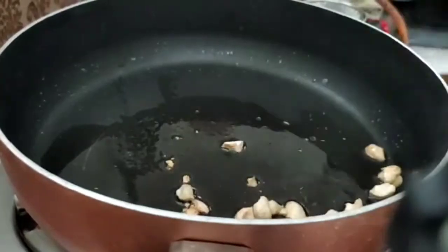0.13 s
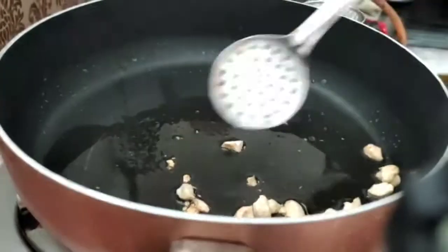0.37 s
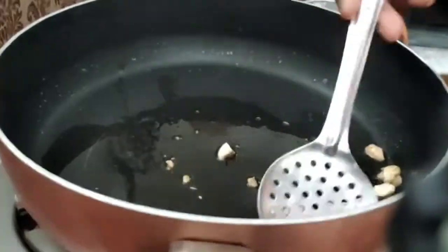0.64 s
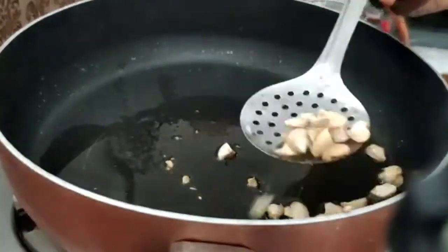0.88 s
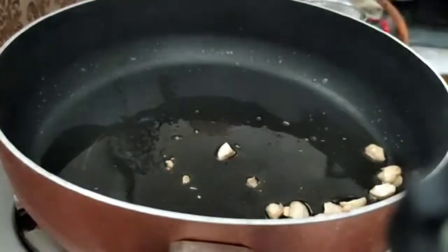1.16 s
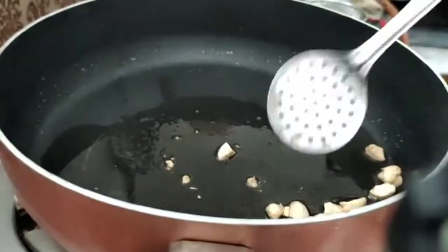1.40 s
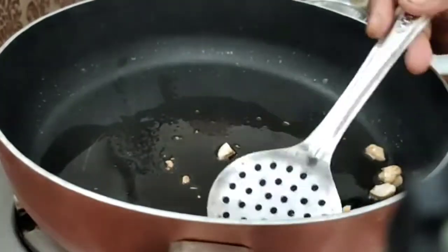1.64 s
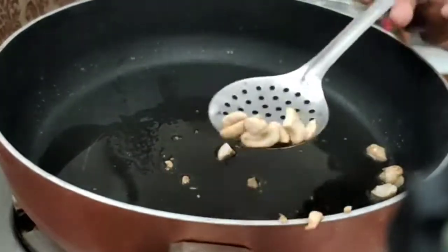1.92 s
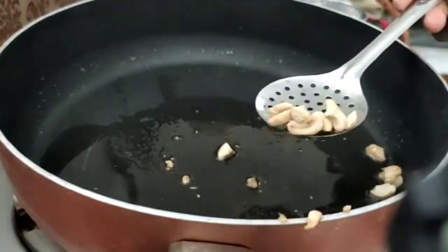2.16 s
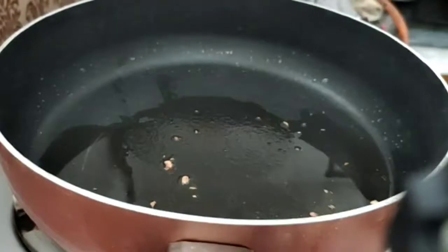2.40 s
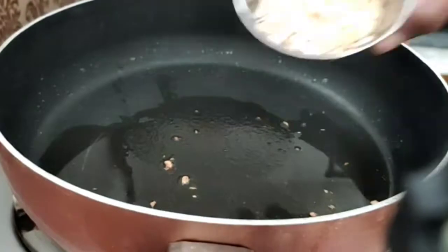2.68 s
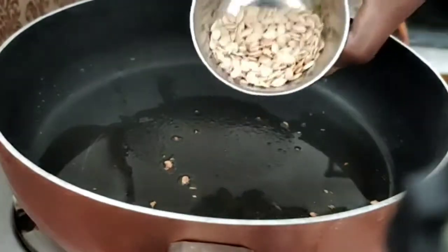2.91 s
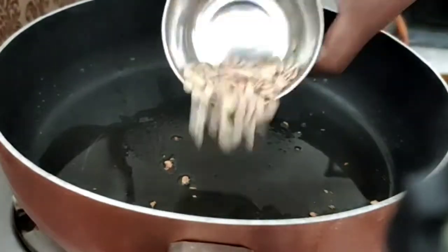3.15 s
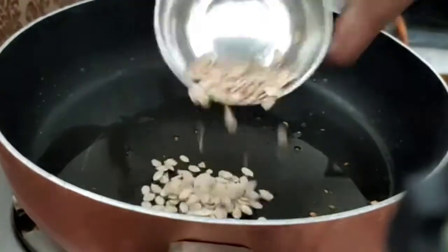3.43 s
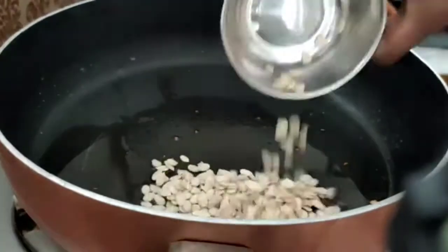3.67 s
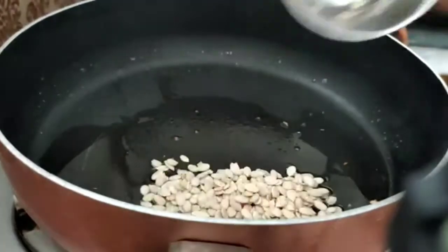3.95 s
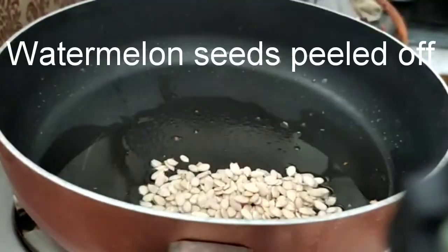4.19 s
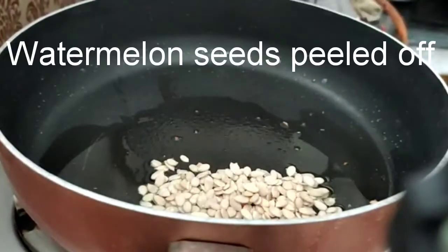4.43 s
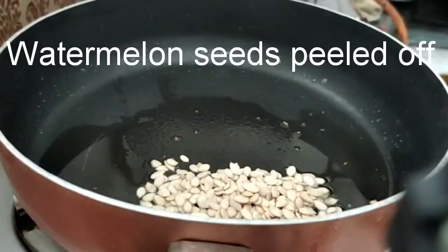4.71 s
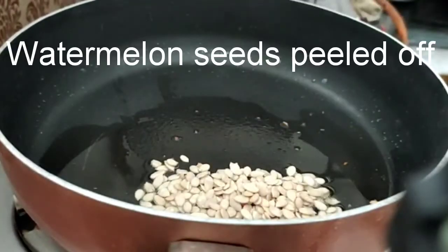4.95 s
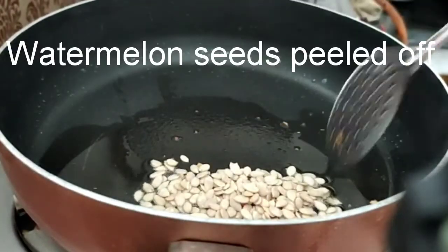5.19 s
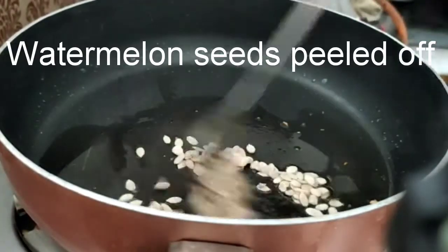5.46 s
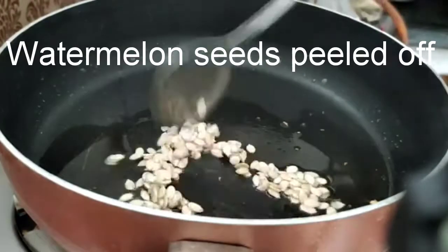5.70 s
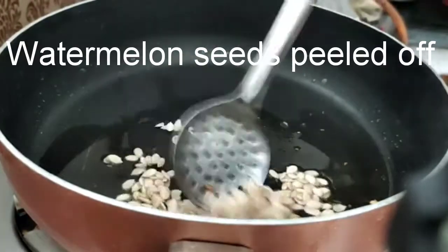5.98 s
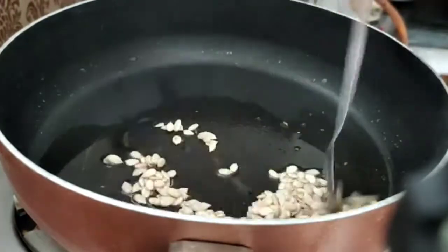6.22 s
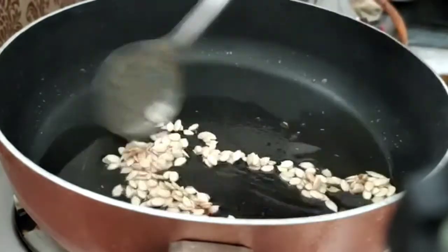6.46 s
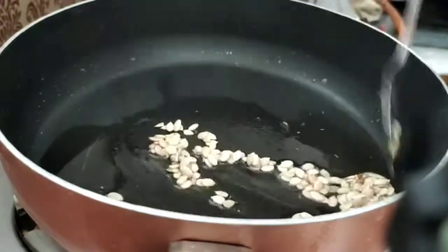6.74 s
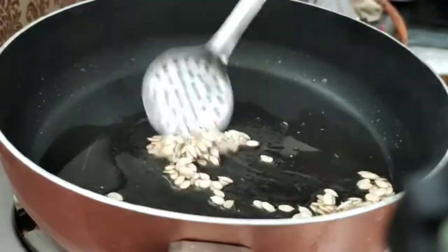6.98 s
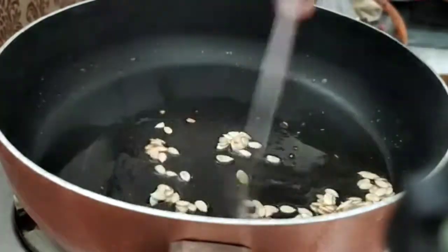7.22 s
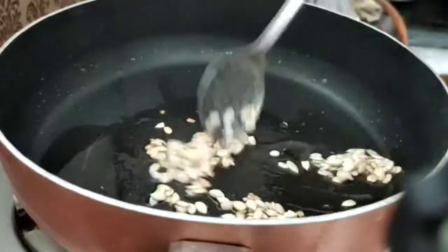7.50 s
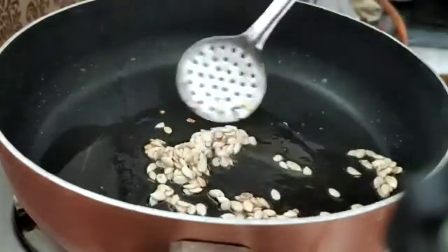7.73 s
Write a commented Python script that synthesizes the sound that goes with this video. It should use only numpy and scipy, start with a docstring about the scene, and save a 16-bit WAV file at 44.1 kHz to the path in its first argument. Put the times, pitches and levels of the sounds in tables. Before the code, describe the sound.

A quiet kitchen with a low, wavering hum, heard close up in stereo. Faint handling at first, then at about 0.5 s a spoon knocks the pan with a hollow metallic clack and scrapes until 0.8 s. Soft rings and a light scrape follow near 1.2 s; another knock and drag come at 1.5-1.8 s with small ticks, and a short rub at 2.3 s. After a lull, seeds pour from a steel bowl at 3.2-3.7 s, a bright ringing, pattering rush. Fine sizzle grows from 4 s, with a soft sliding sweep and small dish clinks at 4.7-4.8 s. From 5.2 s the spoon returns, clangs sharply near 5.45 s, and stirs hard: loud knocks, gritty scrapes and rattling seeds several times a second over bright fizz. From 6.3 s steady dull, boomy thuds beat about seven times a second to the end at nearly 8 s.

```python
"""In a quiet, humming kitchen a slotted steel spoon scoops nuts out of a wide coated pan; seeds are stirred into hot fat.
Spoon knocks and drags are noisy contacts that excite the pan's resonances; steel clinks are chattering touches
on ringing modes, and seeds poured from a steel bowl keep its resonances sounding.
Fizz is dense coloured grains, with ticks and rattling seeds; dull thuds boom nearby and beat steadily late on.
Reflections and a side signal spread it over two close microphones; short low noise lumps differ in each channel."""
import sys
import numpy as np
from scipy import signal
from scipy.fft import rfft, irfft
from scipy.io import wavfile
from scipy.ndimage import uniform_filter1d

SR = 44100
rng = np.random.default_rng(int(sys.argv[2]) if len(sys.argv) > 2 else 0)


def int16_out(signal):
    """Quantize to a 16-bit WAV file."""
    q = np.round(np.clip(np.atleast_2d(signal).T, -1, 1) * 32767)
    wavfile.write(sys.argv[1], SR, q.astype(np.int16))


def boost_factor(decibels):
    """Convert a level in decibels to a linear amplitude factor."""
    exponent = np.asarray(decibels, float) / 20
    return 10 ** exponent


N = 347067

# kitchen murmur of air and appliances: (t/s, level/dB)
HUM_LEVEL = [(0, -67.5), (.3, -80), (.5, -76), (.9, -65.5), (1.1, -68), (1.5, -72.5), (1.77, -63.5),
             (2.2, -71.5), (2.6, -72), (3.09, -75), (3.3, -62.5), (3.62, -72), (3.75, -64), (4.38, -75.5),
             (4.5, -65), (5.2, -72.5), (5.6, -56), (6.3, -66)]
# spectrum of the murmur's air: (f/Hz, relative level/dB)
HUM_SPECTRUM = [(18, -72), (40, -21), (114, -33), (197, -14.5), (285, -14.5), (357, -15.5), (466, -4.5),
                (584, -4.5), (1270, -19), (1530, -11.5), (1760, -24), (4000, -43), (5200, -71),
                (8800, -120)]

# fat fizzing: (t/s, fizz level/dB, finest spray level/dB)
FIZZ_LEVELS = [(0.0, -72.5, -72), (0.16, -89, -73), (0.2, -72, -61), (0.3, -81, -73), (0.45, -77.5, -75),
               (0.52, -65.5, -68), (0.68, -74, -69), (1.05, -78.5, -79), (1.55, -69.5, -61),
               (1.75, -85, -64), (1.87, -62, -67), (2.0, -81.5, -65), (2.07, -78, -67), (2.26, -70, -73),
               (2.42, -67, -80), (2.5, -72, -82), (2.63, -82, -82), (2.75, -64.5, -83), (2.9, -80, -76),
               (2.94, -84, -84), (3.12, -80, -86), (3.35, -60.5, -83), (3.85, -78, -66),
               (4.0, -61.5, -52.5), (4.23, -60, -52), (4.37, -58.5, -59), (4.41, -65.5, -64),
               (4.66, -64.5, -56), (4.85, -64.5, -58), (5.13, -68.5, -68), (5.5, -53, -48),
               (5.94, -57.5, -53), (6.24, -58.5, -56), (6.4, -60, -54), (6.66, -62.5, -59),
               (6.9, -59.5, -59), (7.55, -58.5, -59), (7.87, -72, -64)]
# spectrum of the bursting bubbles: (f/Hz, relative level/dB)
FIZZ_SPECTRUM = [(1180, -13.5), (2000, -1), (2180, -18), (2610, -2), (3830, -2.5), (4240, -1), (4550, -1),
                 (7910, -2), (9320, -2.5), (11000, -3), (12500, 1), (15800, -0.5)]
# seeds and spatter ticking: (t/s, level/dB, t60/s)
SEED_TICKS = [(1.764, -26, 0.077), (1.807, -35.5, 0.16), (1.8453, -27.5, 0.06), (2.615, -58, .02),
              (2.6974, -48, 0.2), (2.847, -47, 0.029), (2.89, -47.5, 0.037), (3.1974, -24.5, 0.096),
              (3.211, -28, 0.1), (3.224, -35, 0.12), (3.251, -36, 0.16), (3.274, -26.5, 0.15),
              (3.291, -25, 0.075), (3.3294, -48, 0.036), (3.3632, -29.5, 0.04), (3.4333, -24.5, 0.082),
              (3.479, -33, 0.04), (3.495, -21.5, 0.033), (3.524, -36, 0.057), (3.537, -29.5, 0.028),
              (3.561, -32.5, 0.031), (3.673, -25.5, 0.05), (3.677, -24, 0.097), (3.869, -41.5, 0.17),
              (3.9017, -32.5, 0.05), (4.317, -32.5, 0.044), (4.428, -43, 0.032), (4.52, -48, 0.026),
              (4.61, -45, 0.02), (4.988, -41.5, 0.12), (5.016, -41, 0.11), (5.3146, -30, 0.078),
              (5.621, -22, 0.028), (5.7864, -27, 0.045), (5.874, -30, 0.04), (5.901, -30.5, 0.021),
              (5.963, -30, 0.045), (5.995, -30, 0.035), (6.0217, -29, 0.02), (6.042, -29.5, 0.039),
              (6.0698, -25.5, 0.028), (6.226, -34, 0.018), (6.248, -29, 0.092), (6.298, -29.5, 0.089),
              (6.449, -34, 0.037), (6.469, -35, 0.018), (6.663, -36, 0.027), (6.764, -26, 0.041),
              (6.802, -29.5, 0.2), (6.912, -38, .02), (7.048, -31, 0.027), (7.213, -14.5, 0.013),
              (7.375, -37, .04), (7.461, -27.5, 0.038)]
# spectrum of the ticks: (f/Hz, relative level/dB)
TICK_SPECTRUM = [(1500, -26), (2800, -7.5), (4200, -4), (7000, -3), (10500, -3), (12500, 0.5), (15800, 0.5)]

# short rough rings and squeaks of cookware: (t/s, level/dB, start f/Hz, end f/Hz, length/s)
COOKWARE_RINGS = [(0.0, -68.5, 2360, 2350, 0.049), (0.198, -67, 5500, 5500, 0.05),
                  (0.458, -60, 958, 947, 0.13), (0.863, -61, 2090, 1930, 0.12),
                  (0.873, -67, 2750, 2620, 0.09), (0.916, -61, 2540, 2400, 0.072),
                  (0.97, -58, 2410, 2250, 0.127), (0.962, -58, 900, 900, 0.047),
                  (1.12, -68, 1720, 1650, 0.22), (1.22, -64, 870, 883, 0.16),
                  (2.09, -69, 1204, 1200, 0.062), (2.177, -57, 980, 1000, 0.068),
                  (2.445, -66.5, 990, 990, 0.12), (2.446, -67, 4460, 4550, 0.035),
                  (2.562, -66.5, 1500, 1500, 0.1), (2.861, -71, 1480, 1460, 0.066),
                  (2.929, -75, 1090, 1073, 0.19), (3.018, -68, 1500, 1500, 0.077),
                  (3.106, -73, 1250, 1250, .05), (4.669, -54, 865, 873, 0.052), (4.75, -53, 878, 840, 0.08),
                  (4.971, -60.5, 1420, 1460, 0.05), (5.135, -62, 1460, 1450, 0.06),
                  (6.514, -46.5, 2385, 2380, 0.086), (7.175, -42, 1540, 1562, 0.071),
                  (7.39, -49.5, 2130, 2140, 0.063), (7.429, -54, 2390, 2410, 0.062)]
# airy rustles of handling: (t/s, level/dB, start f/Hz, end f/Hz, length/s)
HANDLING_RUSTLES = [(0.17, -64, 11000, 9200, 0.06), (2.0, -69, 4700, 4000, 0.068),
                    (2.43, -64, 8000, 8800, 0.29), (2.45, -69.5, 10000, 9300, 0.24),
                    (2.1, -66.5, 1400, 1300, 0.33), (2.66, -68.5, 8700, 8000, 0.12),
                    (2.85, -75, 1300, 1300, 0.26), (2.815, -70.5, 3800, 3400, 0.12),
                    (2.82, -77, 12200, 11000, 0.12), (3.02, -77, 4700, 4700, 0.068)]

# resonances of the pan's low, middle and high modes: (f/Hz, width/Hz, level/dB)
PAN_LOW_MODES = [(527.3, 9.8, -3.5), (751, 90, -8.5), (809.5, 21.2, 3.5), (868, 35, -6)]
PAN_MIDDLE_MODES = [(1004, 17, -1), (1293, 99, -5), (1534, 15, -2.5), (1817, 44, -11.5)]
PAN_HIGH_MODES = [(2137, 81, 0), (2398, 53, 2.5), (2632, 49, -1), (3130, 45, 2), (3630, 79, -5.5),
                  (3920, 24, -3), (4356, 74, -4.5), (5050, 106, -8.5), (6520, 45, -6.5), (8080, 57, -10.5),
                  (12300, 72, -7)]
# bands of the rasp of many close modes, one row each for low, middle, high: (lower f/Hz, upper f/Hz)
RASP_BANDS = [(480, 905), (950, 1916), (2000, 6070)]
# reach of the pitch bending under pressure, one value each for low, middle, high modes: (time shift/s)
PITCH_GLIDES = [.0001, .0007, .0007]
# the pan's faint murmur between strokes, one value each for low, middle, high modes: (level/dB)
RESTING_LEVELS = [-92.5, -85.5, -80.5]

# Rubbing contacts on the pan; where it is touched decides which modes sound. All three tables:
# (t/s, length/s, low modes level/dB, middle modes level/dB, high modes level/dB, ringing over rasp level/dB)
# strokes that start with a landing of the spoon or of seeds
LANDING_STROKES = [(.066, 0.034, -87, -67, -63, 29), (.538, 0.094, -34, -46, -35.5, 17),
                   (.984, 0.01, -60.5, -60.5, -57, 5), (1.526, 0.095, -38, -49, -39.5, 21),
                   (1.672, 0.068, -45.5, -43, -48.5, 3.5), (1.922, 0.099, -63, -68, -73.5, -20),
                   (3.195, 0.24, -62, -56, -51, 13), (3.43, 0.11, -54, -56, -55, -4.5),
                   (3.677, 0.034, -53, -51, -48.5, -6), (3.87, 0.026, -64, -70, -85, -6),
                   (4.84, 0.0099, -50, -48.5, -47.5, -6), (5.134, 0.035, -82, -67, -57, -10),
                   (5.247, 0.09, -47, -48, -50, -11.5), (5.413, 0.05, -38, -47.5, -55, 15),
                   (5.577, 0.045, -38.5, -41.5, -43.5, -4), (5.735, 0.074, -38.5, -42.5, -46, 2),
                   (5.915, 0.037, -43, -64, -62, 0.5), (6.093, 0.062, -35.5, -41.5, -37.5, 4),
                   (6.335, 0.066, -42, -48.5, -43.5, -5), (6.503, 0.11, -43.5, -43, -39.5, 1),
                   (6.684, 0.021, -41, -47.5, -41.5, 1), (6.936, 0.062, -36, -44, -45, 3),
                   (7.08, 0.025, -64, -50, -41.5, -7), (7.14, 0.062, -37.5, -51, -36, 1),
                   (7.353, 0.079, -38.5, -43, -47.5, 0.5), (7.487, 0.033, -35.5, -44.5, -54.5, 0),
                   (7.555, 0.081, -39, -43, -39, 15), (7.758, 0.015, -42, -34, -49.5, 25)]
# sweeps that swell as the spoon or a heap of seeds gathers speed
SWELLING_SWEEPS = [(.16, 0.059, -81, -61.5, -68, 2), (0.673, 0.064, -48, -40, -51, 3),
                   (0.735, 0.064, -47, -40, -44.5, 2), (0.809, 0.021, -48, -51, -76, 3.5),
                   (1.06, 0.063, -75, -64, -76, 12), (1.19, 0.14, -52.5, -53, -57, 3),
                   (1.62, 0.023, -42, -50, -82, 4), (2.64, 0.064, -72, -61.5, -66, 1),
                   (3.96, 0.13, -69, -58.5, -93, 4), (4.13, 0.21, -46, -51.5, -53.5, -5),
                   (4.65, 0.12, -50, -55, -46.5, -16), (7.169, 0.08, -41, -39, -41, -1),
                   (6.774, 0.065, -47, -42.5, -38, -2.5), (7.589, 0.092, -37, -44, -59, 0.5),
                   (7.779, 0.034, -42, -55, -38.5, 4)]
# an even broad rub with low boom, cut off abruptly
CUT_OFF_RUB = [(2.264, 0.14, -52.5, -54, -48, -9)]

# spoon on pan: (t/s, low band level/dB, middle, high and top bands over low, each level/dB)
PAN_KNOCKS = [(0.064, -59.5, 14, 23.5, -14), (0.104, -64, 2, 23.5, -20), (0.172, -67, -4, 0, 18),
              (0.191, -58, -4, -6, -5), (0.259, -45, 6.5, -7.5, -31), (0.527, -63, 2, 19, 22),
              (0.54, -26.5, -6, -9, -26), (0.5638, -24, -7.5, -17, -35), (1.286, -47, 8, 13, 4),
              (1.296, -49, 4, 13, -7), (1.317, -42.5, 2, 0, -17), (1.525, -29.5, -8, -5, -30),
              (1.677, -36, 9, -8, -32), (1.702, -41, 14, 10.5, 5), (1.763, -53.5, 2, 14, 18),
              (1.922, -47.5, 2, -23, -21), (3.676, -53.5, 10, 13.5, 32), (4.693, -46.5, 6, 8, 12),
              (4.737, -48.5, -8, 16.5, 16), (4.839, -43, 9.5, 12, 4), (5.245, -36.5, 1, -9, -13),
              (5.304, -52, -7, 9, 18.5), (5.41, -17, 4, 8, -4), (5.574, -21, -3, 3, -5),
              (5.732, -12.5, 4, 1.5, -19.5), (5.917, -32, -32.5, -29, -17), (6.09, -26.5, 8, 10.5, 1),
              (6.334, -34.5, -7, -14, -3), (6.356, -36.5, -5, -1, 9), (6.501, -23, 2.5, 0.5, -10),
              (6.595, -40.5, -1, -5, 11.5), (6.933, -14, -7, -3, -23), (7.137, -17, -1.5, -1.5, -13.5),
              (7.212, -34.5, -2, 11.5, 6.5), (7.551, -14, -8, -5, -17), (7.756, -14.5, -28, -6.5, -15),
              (7.81, -33, -10, 7, 2.5)]
# heavily damped clack of a blow, one row each for low, middle, high, top band: (f/Hz, width/Hz, level/dB)
CLACK_BANDS = [(796, 130, 36.5), (1500, 98, 28), (2770, 530, 26.5), (6440, 6500, 12.5)]
# treble spectrum of crunch and patter: (f/Hz, relative level/dB)
CRUNCH_SPECTRUM = [(2500, -89), (4500, -5), (6000, -2.5), (8000, -2), (11000, 0), (14000, 1.5), (16000, -9)]

# dull thuds nearby: (t/s, level/dB, t60/s)
THUD_BLOWS = [(0.072, -48, 0.18), (0.193, -55, 0.46), (1.085, -54.5, 0.21), (1.925, -54, 0.24),
              (1.995, -50.5, 0.35), (2.185, -59, 0.12), (2.295, -51, 0.15), (2.345, -51, 0.19),
              (2.565, -56, 0.4), (3.69, -47, 0.36), (5.252, -41.5, 0.22), (6.353, -32, 0.65),
              (6.526, -33, 0.6), (6.679, -31.5, 0.75), (6.811, -34, 0.56), (6.948, -32, 0.66),
              (7.079, -36, 0.62), (7.214, -30.5, 0.66), (7.351, -28, 0.4), (7.484, -29.5, 0.46),
              (7.622, -32, 0.82), (7.755, -35.5, 0.6)]
# resonances that boom under soft blows: (f/Hz, width/Hz, level/dB)
BOOM_MODES = [(189, 46, -12), (343.6, 32, 1.5), (445, 162, -5), (540, 35, 2.5), (634, 22, -6.5),
              (800, 180, -7.5), (990, 20, -23)]
# resonances of the worktop struck by single impulses: (f/Hz, width/Hz, level/dB)
STRUCK_WORKTOP_MODES = [(346.4, 11.3, 48.5), (529, 17, 53), (609.5, 15, 45.5), (190, 21, 19.5),
                        (443, 8, 32), (814, 13, 35.5), (410, 9.6, 42.5), (730, 16, 25), (934, 17, 41.5)]

# short low-frequency noise lumps: (t/s, level/dB, t60/s)
LOW_LUMPS = [(1.699, -73, .1), (3.17, -68, 0.79), (3.43, -70, 0.33), (3.66, -64, 0.21), (4.7, -79, 0.18),
             (5.41, -51, 0.084), (5.455, -49, 0.12), (5.735, -65, .15), (6.1, -72, .4), (6.4, -73, .6),
             (6.8, -70, .6), (7.2, -70, .6), (7.55, -68, .6)]

# steel on steel, spoon and dish: (t/s, level/dB, brightness/dB per octave, chatter t60/s, rise/s)
SPOON_TOUCHES = [(3.142, -23, -1, 0.18, 0.026), (3.648, -27, 8, 0.053, 0.0051),
                 (5.133, -32, -14, 0.061, 0.0004), (5.452, -13.5, 10.5, 0.072, 0.000069)]
DISH_TOUCHES = [(4.7123, -33, -0.41, 0.13, 0.00011), (4.7381, -40, -0.15, 0.035, .0001),
                (4.8409, -32, -0.11, 0.0098, 0.000092)]
# struck modes of spoon and dish: (f/Hz, level/dB, t60/s)
SPOON_MODES = [(3420, -7, .16), (3500, -11, .08), (3580, -2, .09), (3660, -8, .07), (3962, -18, .12),
               (4830, -10, .32), (4900, -16, .12), (7430, -20, .09), (7510, -16, .14), (7590, -12, .08),
               (8942, -22, .12), (11000, -27, .07)]
DISH_MODES = [(1157, -10, 0.17), (1895, -6, 0.04), (2729, -17, 0.2), (3220, -12, 0.08), (4188, -5, 0.28),
              (1809, -16, .2), (6024, -14, .15), (7400, -14, .1), (4963, -4, 0.12), (5206, -8, .42),
              (6519, -4, 0.13), (8317, -12, 0.12)]
# seeds sliding in the bowl keep it ringing: (t/s, length/s, level/dB)
BOWL_POURS = [(3.181, 0.16, -17), (3.42, 0.035, -21.5), (3.52, 0.039, -37.5), (3.66, 0.044, -36),
              (3.88, 0.016, -39)]
# resonances of the steel bowl: (f/Hz, width/Hz, level/dB)
BOWL_MODES = [(767, 85, -9), (1497, 20, 3.5), (1542, 39, -4.5), (2580, 110, -13.5), (3120, 22, -2.5),
              (3660, 150, -11), (4950, 150, -15), (5870, 66, -12), (6430, 60, -10), (7960, 190, -13),
              (9680, 140, -14), (12500, 60, -16), (14900, 90, -18)]

# spectrum of the difference between the microphones: (f/Hz, relative level/dB)
SIDE_SPECTRUM = [(60, 3), (110, -7), (200, -13.5), (380, -16.5), (700, -8.5), (1290, -5), (2380, 1),
                 (4400, -0.5), (8120, 0.5), (15000, 1.5)]
# balance of the two microphones: (t/s, left over right level/dB)
BALANCE = [(0.0, -2), (0.04, 0), (1.22, 0), (1.29, 2.5), (1.38, 0.5), (3.72, -1), (7.87, -0.5)]

LANDING_RISE = 0.17   # share of a contact's length
FADE_DB_PER_S = 267   # extra fade after letting go


def rms_one(x):
    """Scales a signal to an rms of 1."""
    return x / np.sqrt(np.mean(x ** 2) + 1e-20)


def in_time(rows):
    """Draws each column of a timed table as a line over the whole scene."""
    s, *columns = np.transpose(np.vstack(rows))
    return [np.interp(np.arange(N) / SR, s, c) for c in columns]


def wander(per_s):
    """Slow random drift: straight lines between normal draws of spread 1."""
    knots = rng.standard_normal(round(per_s * N / SR) + 2)
    return np.interp(np.arange(N) * per_s / SR, np.arange(len(knots)), knots)


def colour(x, points):
    """Causal (minimum-phase) filter of unit energy that follows a spectrum."""
    hz, db = np.transpose(points)
    grid = np.maximum(np.fft.rfftfreq(4096, 1 / SR), 1)
    log_spectrum = np.log(boost_factor(np.interp(np.log(grid), np.log(hz), db)))
    # folding the cepstrum onto positive times gives minimum phase
    cepstrum = irfft(log_spectrum)
    cepstrum[1:2048] *= 2
    cepstrum[2049:] = 0
    pulse = irfft(np.exp(rfft(cepstrum)))
    return signal.oaconvolve(x, pulse / np.linalg.norm(pulse))[:N]


def resonate(x, peaks):
    """Parallel two-pole resonances, signs alternating."""
    out = 0
    for k, (hz, width_hz, db) in enumerate(peaks):
        r = np.exp(-np.pi * width_hz / SR)
        b = [(1 - r * r) / 2, 0, (r * r - 1) / 2]
        a = [1, -2 * r * np.cos(2 * np.pi * hz / SR), r * r]
        out = out + (-1) ** k * boost_factor(db) * signal.lfilter(b, a, x + 1e-18)
    return out


def grains(per_s, spread_db):
    """Random contacts of uneven size; rms 1."""
    sizes = boost_factor(spread_db * np.minimum(rng.exponential(1, N), 4)) * rng.standard_normal(N)
    return rms_one(sizes * (rng.random(N) < per_s / SR))


def bursts(times, levels_db, t60s, rise_s):
    """Envelope that jumps up at each event and dies away by 60 dB."""
    out = np.zeros(N)
    for s, db, t60, rise in zip(times, levels_db, t60s, np.broadcast_to(rise_s, len(times))):
        at = round(s * SR)
        decay_s = max(t60, .002)
        t = np.arange(min(N - at, round(decay_s * SR))) / SR
        onset = 1 - np.exp(-(t / max(rise, 1e-5)) ** 2)
        out[at:at + len(t)] += boost_factor(db - 60 * t / decay_s) * onset
    return out


def swells(starts, lengths, levels_db, rise_share, fade_db_per_s):
    """Envelope of rubbing contacts: rise, slow sag, fade; one row for each row of levels."""
    sag_db_per_s = 64
    levels_db = np.atleast_2d(levels_db)
    out = np.zeros((len(levels_db), N))
    for s, length_s, db in zip(starts, lengths, levels_db.T):
        at = round(s * SR)
        t = np.arange(min(N - at, SR // 2)) / SR
        loss_db = sag_db_per_s * t + fade_db_per_s * np.maximum(t - length_s, 0)
        rise = np.minimum(t / (rise_share * length_s), 1) ** 2
        out[:, at:at + len(t)] += boost_factor(db)[:, None] * boost_factor(-loss_db) * rise
    return out


def stroke_forces():
    """How hard the low, middle and high modes are rubbed over time; the cut-off rub's low force also alone."""
    kinds = (
        (LANDING_STROKES, LANDING_RISE, FADE_DB_PER_S),
        (SWELLING_SWEEPS, 0.66, FADE_DB_PER_S),
        (CUT_OFF_RUB, 0.18, 1495),
    )
    out = []
    for rows, rise_share, fade_db_per_s in kinds:
        s, length_s, *groups_db, _ = np.transpose(rows)
        out.append(swells(s, length_s, groups_db, rise_share, fade_db_per_s))
    return sum(out), out[2][0]


def hum(stirred):
    """Dull room noise with one wavering tone; the low noise rises with the strokes."""
    tone_hz, tone_width_hz, tone_over_air_db = 351.6, 12.8, 1
    waver_db, low_noise_over_stroke_db = 6.5, -25.5
    air = colour(rng.standard_normal(N), HUM_SPECTRUM)
    tone = rms_one(resonate(rng.standard_normal(N), [(tone_hz, tone_width_hz, 0)]))
    level = boost_factor(in_time(HUM_LEVEL)[0] + waver_db * wander(per_s=11))
    murmur = level * (air + boost_factor(tone_over_air_db) * tone)
    return murmur + boost_factor(low_noise_over_stroke_db) * stirred * air


def fizz(stirred):
    """Fine bubbles burst as a bright dense hiss; single seeds and spatter tick out of it."""
    spray_hz, split_hz = 11900, 6300
    stirred_fizz_db, stirred_spray_db = -15.5, -14   # over the stroke's force on the high modes
    thinning, full_body_db = 0.78, -53.5   # dB of body lost per dB that the fizz lies below full
    fizz_db, spray_db = in_time(FIZZ_LEVELS)
    fizz_level = boost_factor(fizz_db) + boost_factor(stirred_fizz_db) * stirred
    spray_level = boost_factor(spray_db) + boost_factor(stirred_spray_db) * stirred

    hiss = colour(grains(12000, spread_db=2.5), FIZZ_SPECTRUM)
    spray = signal.sosfiltfilt(signal.butter(5, spray_hz, "high", fs=SR, output="sos"), hiss)
    dull = signal.sosfiltfilt(signal.butter(2, split_hz, fs=SR, output="sos"), hiss)
    # faint fizz is thinner
    body = boost_factor(thinning * np.minimum(20 * np.log10(fizz_level) - full_body_db, 0))
    bands = (body * dull, hiss - spray - dull)
    patchy = sum(band * boost_factor(2.5 * wander(per_s=12)) for band in bands)
    patchy_spray = rms_one(spray * boost_factor(3.7 * wander(per_s=14)))

    s, db, t60 = np.transpose(SEED_TICKS)
    snaps = bursts(s, db - 8.5, np.full(len(s), .008), rise_s=0.000074)
    tails = bursts(s, db - 8.5, t60, rise_s=0.00096)
    ticks = colour((snaps + tails) * rng.standard_normal(N), TICK_SPECTRUM)
    return fizz_level * rms_one(patchy) + spray_level * patchy_spray + ticks


def rings(rows, width_share):
    """Each is a rough narrow tone that swells quickly, may glide, comes in broken strands and fades."""
    out = np.zeros(N)
    for s, db, start_hz, end_hz, length_s in rows:
        at, size = round(s * SR), round(length_s * SR)
        # slow noise from a double pole roughens the tone; its width is a share of the pitch
        r = np.exp(-np.pi * width_share * start_hz / SR)
        flutter = signal.lfilter([1], [1, -2 * r, r * r], rng.standard_normal((2, SR // 2)))
        flutter = flutter[:, 2000:2000 + size]
        phase = 2 * np.pi * np.cumsum(np.linspace(start_hz, end_hz, size)) / SR
        tone = rms_one(flutter[0] * np.cos(phase) + flutter[1] * np.sin(phase))
        strands = boost_factor(db + 3.8 * wander(per_s=45)[at:at + size])
        swell = np.sin(np.pi * np.linspace(0, 1, size) ** 0.45)
        out[at:at + size] += strands * tone * swell
    return out


def pan_body(forces, ring_db, shifting_db):
    """Sharp modes, favoured in turn as the contact moves, ring over a rasp of many close modes."""
    out = 0
    click = np.eye(1, 8192)[0]
    ringing = boost_factor(ring_db)
    mode_groups = (PAN_LOW_MODES, PAN_MIDDLE_MODES, PAN_HIGH_MODES)
    for force, modes, band_hz, glide_s in zip(forces, mode_groups, RASP_BANDS, PITCH_GLIDES):
        # rasp and ringing share the force
        force = force / np.sqrt(1 + ringing ** 2)
        band = signal.butter(3, band_hz, "band", fs=SR, output="sos")
        out = out + signal.sosfilt(band, force) / np.linalg.norm(signal.sosfilt(band, click))
        force = force * ringing / np.linalg.norm(resonate(click, modes))
        rung = 0
        for k, mode in enumerate(modes):
            favoured = force * boost_factor(shifting_db * wander(per_s=14))
            rung = rung + (-1) ** k * resonate(favoured, [mode])
        # pressure bends the pitch: the ringing is read with a drifting time shift
        shift = glide_s * SR * uniform_filter1d(wander(per_s=16), size=1500)
        out = out + np.interp(np.arange(N) + shift, np.arange(N), rung)
    return out


def drag(rubbing):
    """The spoon's edge stutters over the coating: dense uneven contacts shake the pan."""
    s, *_, ring_db = np.transpose(sorted(LANDING_STROKES + SWELLING_SWEEPS + CUT_OFF_RUB))
    # the latest stroke to start sets the balance of ringing and rasp
    current = np.maximum(np.searchsorted(s, np.arange(N) / SR) - 1, 0)
    resting = boost_factor(np.array(RESTING_LEVELS)[:, None] + 0.87 * wander(per_s=11.0))
    stutter = [grains(3500, spread_db=2.6) * boost_factor(2.0 * wander(per_s=60)) for group in rubbing]
    return pan_body((rubbing + resting) * stutter, ring_db[current], shifting_db=3.2)


def echoes(x, t60, gap_s, count):
    """Dense dying clouds of reflections; as things move about, one pattern gives way to another."""
    t, out = np.arange(round(t60 * SR)) / SR, 0
    turn = np.repeat(rng.integers(0, count, N // 2048 + 1), 2048)[:N]
    for k in range(count):
        cloud = rng.standard_normal(len(t)) * boost_factor(-60 * t / t60) * (t >= gap_s)
        share = np.sqrt(np.abs(uniform_filter1d((turn == k) * 1., size=1024)))
        out = out + signal.oaconvolve(x * share, cloud / np.linalg.norm(cloud))[:N]
    return out


def knocks():
    """The edge meets the pan with a crunch, then a short clack; seeds thrown up patter on in the treble."""
    contact_s, patter_t60_s = 0.001524, 0.17   # from crunch to blow; decay of the patter
    s, db, middle_db, high_db, top_db = np.transpose(PAN_KNOCKS)
    forces, clack = [], 0
    for over_db, (hz, width_hz, level_db) in zip((0, middle_db, high_db, top_db), CLACK_BANDS):
        crunch = bursts(s, db + over_db - 2.5, np.full(len(s), .014), rise_s=0.00077)
        forces.append(crunch * rng.standard_normal(N))
        blows = np.zeros(N)
        blows[np.round((s + contact_s) * SR).astype(int)] = boost_factor(db + over_db)
        struck = resonate(blows, [(hz, width_hz, level_db)])
        clack = clack + resonate(struck, [(hz, width_hz * 2, 0)])
    patter = bursts(s, db + top_db - 15.5, np.full(len(s), patter_t60_s), rise_s=0.0013)
    treble = colour(forces[3] + patter * rng.standard_normal(N), CRUNCH_SPECTRUM)
    return clack + pan_body(forces[:3], ring_db=-2.5, shifting_db=5.0) + treble


def thuds(broad_rub):
    """Soft blows set the worktop booming in its low resonances; one note rings on from blow to blow."""
    note_hz, note_db, note_t60_s = 433, -9.5, .9   # note level is over the blow
    rub_boom_db = 23.5   # low boom of the cut-off rub, over its force on the low modes
    s, db, t60 = np.transpose(THUD_BLOWS)
    force = bursts(s, db + 13.5, t60, rise_s=0.00085) + boost_factor(rub_boom_db) * broad_rub
    boom = resonate(force * rng.standard_normal(N), BOOM_MODES)
    blows = np.zeros(N)
    blows[np.round(s * SR).astype(int)] = boost_factor(db)
    struck = resonate(blows, STRUCK_WORKTOP_MODES)
    ringing = bursts(s, db + note_db, np.full(len(s), note_t60_s), rise_s=0.0089)
    note = ringing * np.sin(2 * np.pi * note_hz * np.arange(N) / SR)
    low_cut = signal.butter(3, 165, "high", fs=SR, output="sos")
    return signal.sosfilt(low_cut, boom + struck + note)


def low_lumps():
    """Short low-frequency noise lumps, different in each channel."""
    low_pass = signal.butter(2, 110, fs=SR, output="sos")
    low_noise = signal.sosfilt(low_pass, rng.standard_normal((2, N)))
    return bursts(*np.transpose(LOW_LUMPS), rise_s=0.0042) * rms_one(low_noise)


def clinks(touches, modes):
    """Each touch is a short chatter of steel that sets every mode ringing."""
    s, db, tilt_db, chatter_s, rise_s = np.transpose(touches)
    at = np.round(s * SR).astype(int)
    out, noise = np.zeros(N), rng.standard_normal(N)
    for hz, level_db, t60 in modes:
        # brightness tilts around 4 kHz; long chatter is spread thinner
        strength_db = db + level_db + tilt_db * np.log2(hz / 4000) - 10 * np.log10(chatter_s * SR) + 3.0
        force = bursts(s, strength_db, chatter_s, rise_s) * noise
        # a sudden first touch is the hardest
        force[at] += boost_factor(strength_db + 12.5) * np.exp(-rise_s / 0.0014)
        r, w = boost_factor(-60 / (t60 * SR)), 2 * np.pi * hz / SR
        out += signal.lfilter([0, np.sin(w)], [1, -2 * r * np.cos(w), r * r], force + 1e-18)
    chatter = bursts(s, db - 12, chatter_s, rise_s + 0.00054) * noise
    return out + signal.sosfilt(signal.butter(1, 1500, "high", fs=SR, output="sos"), chatter)


def pour():
    """Seeds tumbling over the rim drive the bowl's resonances."""
    flow = swells(*np.transpose(BOWL_POURS), LANDING_RISE, FADE_DB_PER_S)[0]
    return resonate(flow * grains(2500, spread_db=3.0), BOWL_MODES)


def rattle(stirred):
    """Single seeds click against each other and the pan, each with a short ring at one of twelve pitches."""
    seeds_in_s, over_stroke_db, clicks_per_s = 5.6, -10.5, 390
    clicks = grains(clicks_per_s, spread_db=2.5)
    dealt = rng.integers(0, 12, N)
    out = 0
    for k, hz in enumerate(np.geomspace(1800, 7500, 12)):
        out = out + resonate(clicks * (dealt == k), [(hz, hz * 0.072, 0)])
    return boost_factor(over_stroke_db) * rms_one(out) * stirred * (np.arange(N) > seeds_in_s * SR)


def scene():
    """Layers the sources, adds kitchen reflections and spreads the sum over two microphones."""
    rubbing, broad_rub = stroke_forces()
    cookware = rings(COOKWARE_RINGS, width_share=0.07) + rings(HANDLING_RUSTLES, width_share=0.3)
    steel = clinks(SPOON_TOUCHES, SPOON_MODES) + clinks(DISH_TOUCHES, DISH_MODES) + pour()
    pan = drag(rubbing) + knocks()
    near = fizz(rubbing[2]) + cookware + pan + thuds(broad_rub) + steel + rattle(rubbing[2])
    kitchen = boost_factor(-9.5) * echoes(near, t60=0.22, gap_s=.006, count=3)
    mid = near + kitchen + hum(rubbing[1])
    # the nearest reflections reach the two microphones differently, more so in the treble
    side = boost_factor(0.5) * colour(echoes(mid, t60=0.029, gap_s=0, count=6), SIDE_SPECTRUM)
    left_db = in_time(BALANCE)[0]
    left = (mid + side) * boost_factor(left_db / 2)
    right = (mid - side) * boost_factor(-left_db / 2)
    return np.array([left, right]) + low_lumps()


def band_limit(x):
    """A steep low-pass at the top of the band."""
    return signal.sosfilt(signal.butter(12, 16970, fs=SR, output="sos"), x)


def record(dry):
    """Cuts the lows below 30 Hz and the very top above 16150 Hz."""
    low_cut = signal.butter(2, 30, "high", fs=SR, output="sos")
    top_cut = signal.cheby2(10, 30, 16150, fs=SR, output="sos")
    mix = signal.sosfilt(top_cut, signal.sosfilt(low_cut, dry))
    return band_limit(mix)


dry = scene()
out = record(dry)
int16_out(out)
```